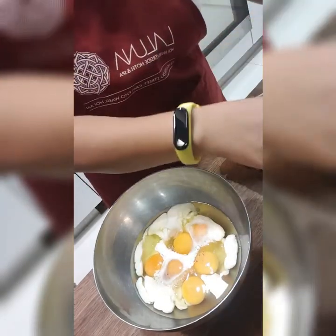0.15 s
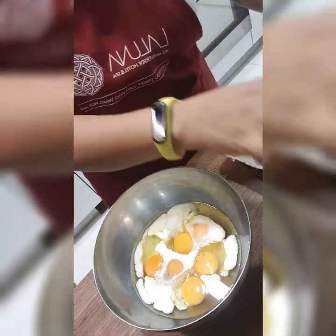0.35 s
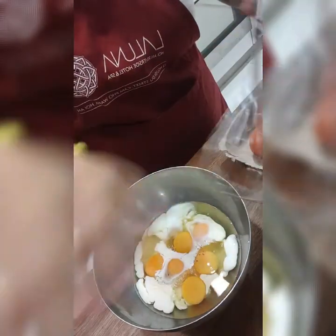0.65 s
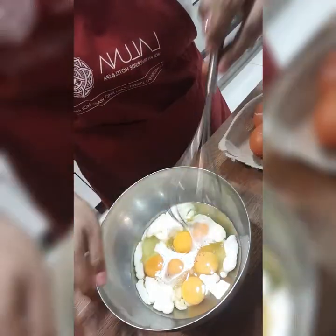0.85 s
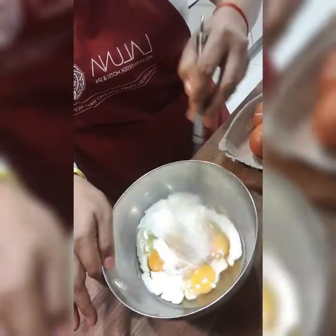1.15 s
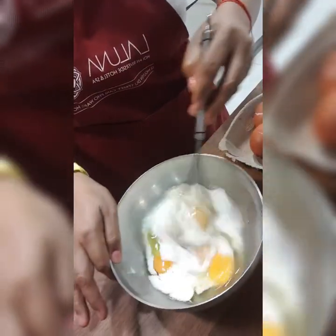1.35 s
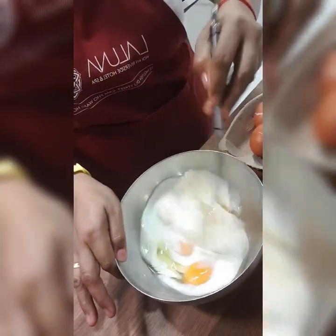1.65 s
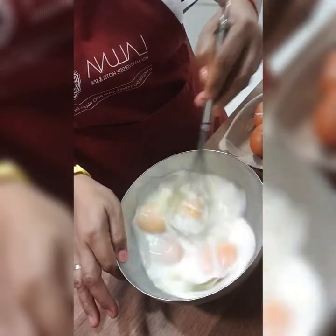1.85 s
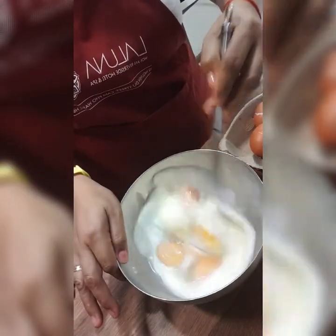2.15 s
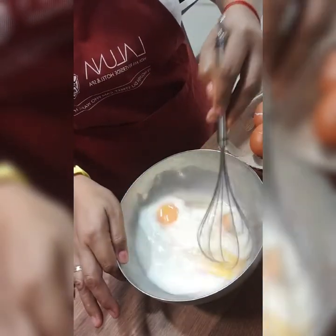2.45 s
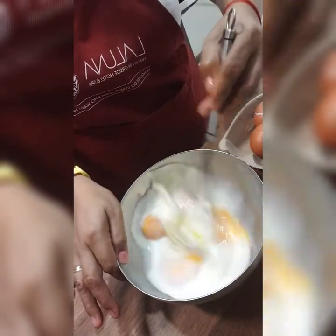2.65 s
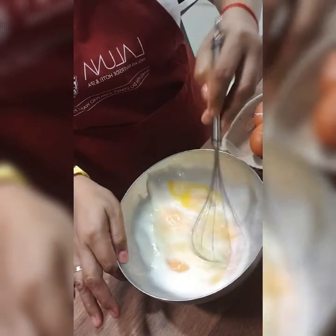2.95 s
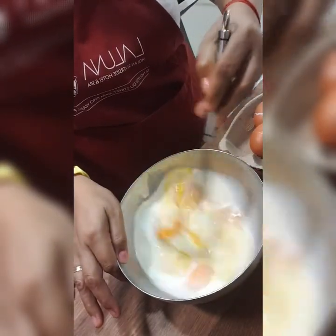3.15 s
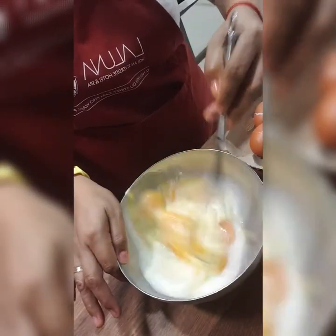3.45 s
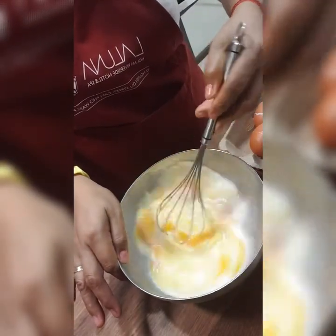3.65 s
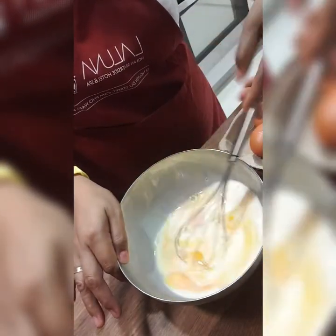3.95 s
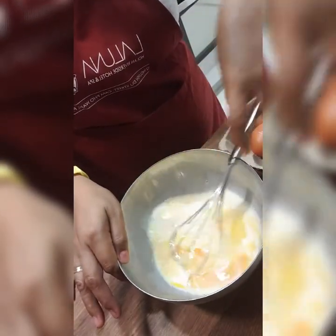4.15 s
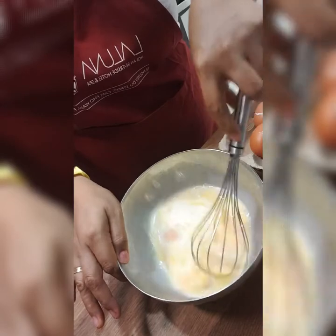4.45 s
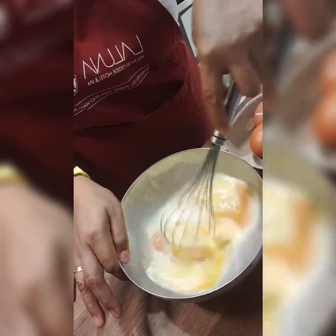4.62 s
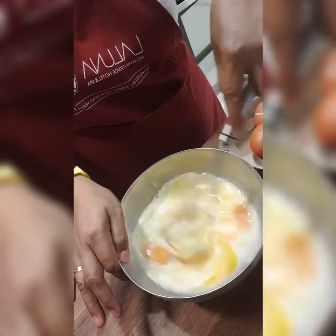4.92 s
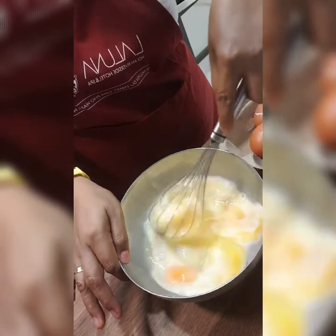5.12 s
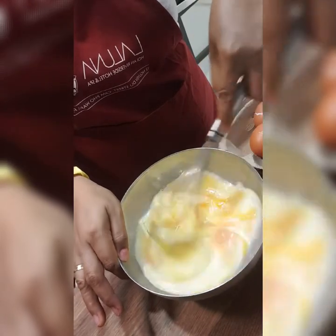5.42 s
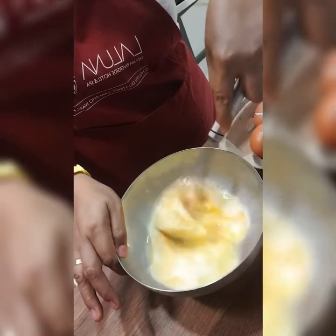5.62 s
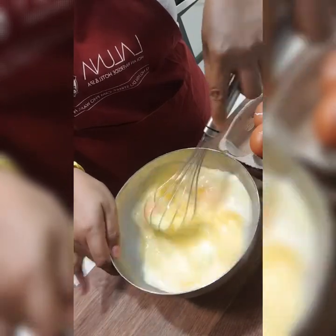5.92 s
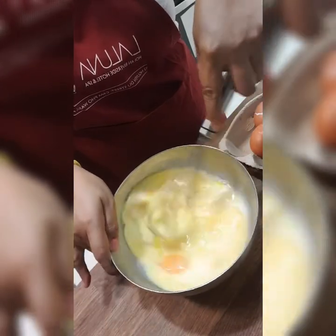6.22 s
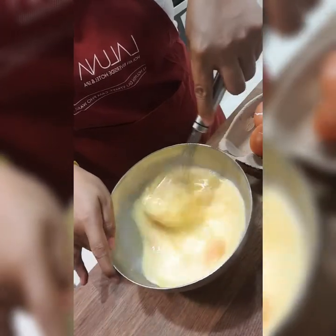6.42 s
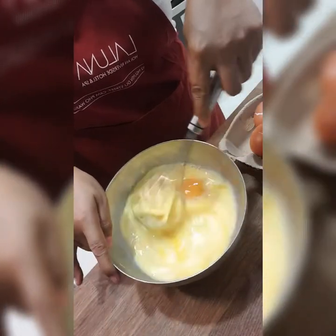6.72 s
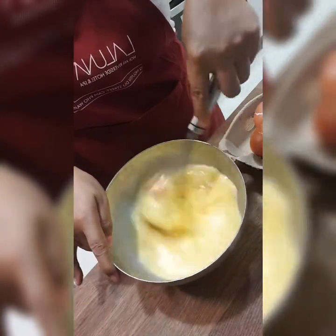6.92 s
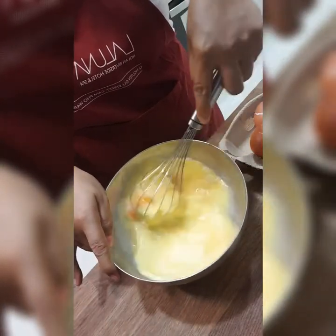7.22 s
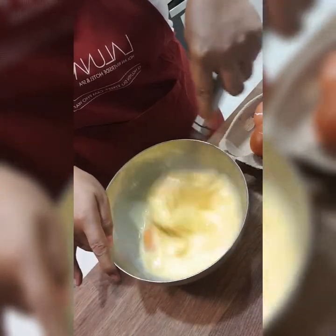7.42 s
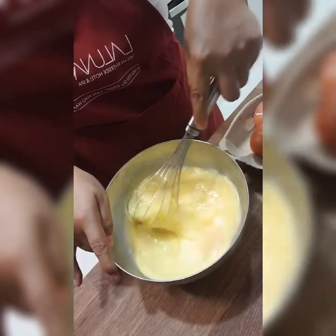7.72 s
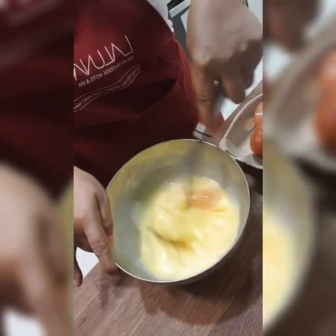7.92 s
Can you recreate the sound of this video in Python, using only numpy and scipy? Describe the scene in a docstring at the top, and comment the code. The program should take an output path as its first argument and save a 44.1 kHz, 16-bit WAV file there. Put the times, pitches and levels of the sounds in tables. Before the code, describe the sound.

Close up in a small kitchen with a faint low hum, a whisk scuffs wood and a steel bowl rocks on the table with quick, fading knocks. After a second the whisk starts: bright metallic clashes and swishes, three or four a second, with small wet plops. Later strokes become wetter and heavier, with slaps, gurgling bubbles and low thumps.

```python
"""Whisking eggs in a steel bowl

Eggs and milk are beaten with a wire whisk in a steel bowl on a wooden table, in a small kitchen with a low hum.
The whisk scuffs the wood and the bowl rocks on its base: friction and impacts excite damped modes.
Then the whisk goes round some three or four times a second: its wires clash on the steel and swish through egg.
Egg slaps shut as bursts of noise, and air pockets ring as damped tones, most with a rising pitch."""
import sys
import numpy as np
from scipy import signal
from scipy.fft import rfft, irfft
from scipy.io import wavfile

SR = 44100
rng = np.random.default_rng(int(sys.argv[2]) if len(sys.argv) > 2 else 0)


def store_pcm(level_fs):
    """Save levels as 16-bit WAV."""
    pcm = np.round(np.clip(level_fs, -1, 1) * 32767).astype(np.int16)
    wavfile.write(sys.argv[1], SR, np.atleast_2d(pcm).T)


N = 355887
TIME = np.arange(N) / SR
AGE = TIME[:SR // 2]  # time since the start of a single event, s

# All table levels are relative: the functions and the final mix scale them.


def from_db(db):
    """Level: decibels to amplitude gain."""
    return 10 ** (np.asarray(db) / 20)


def rms_one(x):
    """Power normalization: scale to unit rms."""
    return x / np.sqrt(np.mean(x ** 2) + 1e-20)


def unit_energy(x):
    """Energy normalization: the impulse response keeps the power of white noise."""
    return x / np.sqrt(np.sum(x ** 2) + 1e-20)


def at_hz(points, hz):
    """Logarithmic frequency scale: interpolate a table along it."""
    table_hz, value = np.transpose(points)
    return np.interp(np.log(np.maximum(hz, 1)), np.log(table_hz), value)


def add(track, s, sound):
    """Superposition: mix a sound into a track at a time."""
    start = max(round(s * SR), 0)
    part = sound[:max(N - start, 0)]
    track[start:start + len(part)] += part


def through(x, response):
    """Linear system: convolve a signal with an impulse response."""
    return signal.fftconvolve(x, response)[:N]


def colour(x, spectrum, size=8192):
    """Minimum-phase filtering: a causal response with the shape of the spectrum, at unit energy."""
    hz = np.arange(size // 2 + 1) * SR / size
    cepstrum = irfft(np.log(from_db(at_hz(spectrum, hz))))
    # folding the cepstrum onto positive times makes the response causal
    cepstrum[1:size // 2] *= 2
    cepstrum[size // 2 + 1:] = 0
    response = irfft(np.exp(rfft(cepstrum)))
    return through(x, unit_energy(response))


def dying(t60):
    """Exponential decay: an envelope that falls 60 dB in t60, held at 1 ms or more."""
    return np.exp(-np.minimum(np.log(1000) * AGE / max(t60, 1e-3), 60))


def ringing(modes):
    """Modal impulse response: damped sines of alternating sign, one row a mode."""
    rows = []
    for k, (hz, db, t60) in enumerate(modes):
        rows.append((-1) ** k * from_db(db) * dying(t60) * np.sin(2 * np.pi * hz * AGE))
    return np.array(rows)


def touched(rings, vary_db):
    """Modal participation: each new point of contact excites the modes in other shares."""
    return from_db(vary_db * rng.standard_normal(len(rings))) @ rings


def grains(per_s, spread_db):
    """Shot noise: random tiny contacts of uneven size and either sign; rms 1."""
    sizes = from_db(spread_db * np.minimum(rng.exponential(1, N), 4))
    signs = rng.choice([-1, 1], N)
    return rms_one(sizes * signs * (rng.random(N) < per_s / SR))


def clumps(per_s, depth_db):
    """Amplitude modulation: an uneven gain with per_s random knots a second; rms 1."""
    knots = np.clip(rng.standard_normal(int(N / SR * per_s) + 2), -2, 2)
    return rms_one(from_db(depth_db * np.interp(TIME * per_s, np.arange(len(knots)), knots)))


def swell(s, db, half):
    """Gaussian envelope: force rises and falls smoothly around a time."""
    return from_db(db) * np.exp(-np.minimum(((TIME - s) / half) ** 2 / 2, 50))


# low hum of the kitchen: pitch_hz, level_db (per Hz)
HUM_COLOUR = [(20, -28.5), (50, -6.5), (105, 3.5), (155, -5.5), (210, -9), (400, -20.5), (600, -26),
              (950, -37), (1400, -44), (4500, -44.5), (6400, -35.5), (8000, -40.5), (9800, -40),
              (16000, -46)]


def hum():
    """Stationary noise: white noise given the spectrum of the room's hum."""
    return from_db(-56) * colour(rng.standard_normal(N), HUM_COLOUR)


# the whisk scuffing the table as it is picked up: middle_s, level_db, half_length_s
SCUFFS = [(-0.019, -33.5, 0.01), (0.206, -86, 0.057), (0.256, -58.5, 0.017), (0.289, -35.5, 0.0058),
          (0.315, -57, 0.028), (0.62, -72.5, 0.031)]
# the whisk's handle and loops lying on the wood: pitch_hz, level_db, t60_s
HANDLE_MODES = [(1015, 2, 0.015), (1680, 3, 0.022), (2310, 6.5, 0.0049), (2880, -5, 0.047),
                (3110, -5, 0.029), (3805, 3.5, 0.007), (4780, 5.5, 0.0081), (7010, 2.5, 0.0057),
                (9720, 2.5, 0.0083), (10400, -12, 0.04)]


def pick_up(scuff_db=-9):
    """Stick-slip friction: the whisk slides over the wood in tiny slips that ring its modes as it lifts."""
    slips = sum(swell(*row) for row in SCUFFS) * grains(per_s=2400, spread_db=3.5)
    clinks = through(slips, unit_energy(ringing(HANDLE_MODES).sum(0)))
    return clinks + from_db(scuff_db) * colour(slips, SWISH_COLOUR)


# the bowl tips and lands on the table: start_s, boom_db, thump_db, knock_db
BUMPS = [(.003, -44, -36.5, -37), (0.057, -37, -42, -32), (1.064, -39.5, -37, -35), (2.286, -42, -62, -40),
         (2.655, -52, -42, -61), (3.576, -45, -38.5, -45), (4.68, -42.5, -37.5, -55.5),
         (4.956, -48.5, -44.5, -50.5), (5.446, -42, -58, -44.5), (5.62, -41, -64, -46),
         (5.645, -35.5, -33, -40), (5.952, -44, -31.5, -45), (6.007, -35.5, -38.5, -62),
         (6.383, -52, -29, -69), (6.943, -47.5, -57, -46), (7.187, -25.5, -38.5, -37),
         (7.696, -27, -26, -30), (7.99, -39, -48, -51)]
# low, lingering modes of the loaded bowl on the table: pitch_hz, level_db, t60_s
BOOM_MODES = [(206.75, 5.5, 0.33), (174.4, 5.5, 0.1), (229.6, 0, 0.2), (285.5, -7.5, 0.17)]
# lowest modes of the bowl on the table: pitch_hz, level_db, t60_s
THUMP_MODES = [(97.1, 3, 0.31), (129.5, -5, 0.46), (51.2, -28, 0.15)]
# higher modes of the bowl on the table, most of them short: pitch_hz, level_db, t60_s
KNOCK_MODES = [(282.3, 5, 0.06), (390, -13.5, 0.029), (503, -3.5, 0.066), (560, -6, 0.054),
               (591, -7.5, 0.061), (900, -31, 0.09), (996, -26.5, 0.36)]


def bumps(boom_db=3.0, thump_db=3, knock_db=3, contact_s=0.0019, thud_db=-9, thud_t60=0.069, thud_hz=420):
    """Modal impact: the bowl's base meets the table; where it lands sets the share of each mode."""
    out, thuds = np.zeros(N), np.zeros(N)
    onset = 1 - np.exp(-AGE / contact_s)
    boom, thump, knock = [ringing(modes) * onset for modes in (BOOM_MODES, THUMP_MODES, KNOCK_MODES)]
    for s, boom_level, thump_level, knock_level in rocking() + pushes() + BUMPS:
        add(out, s, from_db(boom_level + boom_db) * touched(boom, 0.94))
        add(out, s, from_db(thump_level + thump_db) * touched(thump, 1.0))
        add(out, s, from_db(knock_level + knock_db) * touched(knock, 3.5))
        add(thuds, s, from_db(boom_level + thud_db) * dying(thud_t60))
    # the table top's many dull, dense modes are heard as a band of noise
    band = signal.butter(2, [90, thud_hz], "band", fs=SR, output="sos")
    wood = signal.sosfilt(band, signal.unit_impulse(len(AGE)))
    return out + through(thuds * rng.standard_normal(N), unit_energy(wood))


# the first landing of the rocking bowl, and what each later one keeps or loses
ROCK_START_S, ROCK_GAP_S, ROCK_GAP_KEPT, ROCK_UNEVEN_S = .16, .083, .957, .002
ROCK_BOOM_DB, ROCK_THUMP_DB, ROCK_KNOCK_DB = -31.5, -35, -26.5
ROCK_LOSS_DB, ROCK_KNOCK_LOSS_DB = 1.58, 4  # per landing


def rocking(count=9):
    """Energy loss at impact: landings follow at shrinking, slightly uneven gaps, weaker and softer."""
    k = np.arange(count)
    # geometric series of gaps
    s = ROCK_START_S + ROCK_GAP_S * (1 - ROCK_GAP_KEPT ** k) / (1 - ROCK_GAP_KEPT)
    s = s + ROCK_UNEVEN_S * rng.standard_normal(count)
    boom = ROCK_BOOM_DB - ROCK_LOSS_DB * k
    thump = ROCK_THUMP_DB - ROCK_LOSS_DB * k
    knock = ROCK_KNOCK_DB - ROCK_KNOCK_LOSS_DB * k
    return list(zip(s, boom, thump, knock))


# turns of the whisk; the wires strike the wall, then sweep on through the egg:
# start_s, clash_db, rattle_length_s, sweep_delay_s, sweep_db, sweep_wetness_db
STROKES = [(1.0104, -20.5, 0.023, .03, -35, -7), (1.081, -27, 0.026, 0.071, -36.5, -20),
           (1.513, -51.5, 0.0058, 0.057, -50, -15), (1.7885, -22, .025, .05, -45.5, -6),
           (2.122, -49.5, 0.019, 0.037, -64, 2), (2.314, -29.5, 0.018, 0.059, -41.5, -32),
           (2.55, -49.5, 0.0095, 0.086, -38.5, -28), (2.841, -43, 0.031, 0.052, -51.5, 4),
           (2.969, -42.5, 0.006, 0.07, -59, 2.5), (3.118, -40.5, 0.0011, 0.035, -54.5, 5.5),
           (3.314, -22.5, 0.019, 0.084, -44.5, -16), (3.578, -42.5, 0.0067, .078, -43, -9),
           (4.002, -56, .027, 0.056, -47.5, -13), (4.226, -68.5, 0.067, 0.075, -50.5, -26),
           (4.549, -40, 0.014, 0.082, -42, -17), (4.861, -35.5, 0.0067, 0.042, -37, -26),
           (5.111, -38.5, 0.024, 0.052, -34, -10), (5.354, -40, 0.0019, 0.034, -59, -6),
           (5.395, -34, 0.015, 0.044, -33.5, -12), (5.62, -10, 0.0006, 0.024, -40, -5),
           (5.634, -33.5, 0.014, .05, -41, -5), (6.17, -66, 0.009, .046, -41.5, -14.5),
           (6.396, -26.5, 0.0034, 0.082, -42, -6.5), (6.706, -36.5, 0.0075, 0.041, -38, -4.5),
           (6.907, -45.5, 0.0069, .081, -42, -21), (7.189, -27.5, 0.016, .075, -38.5, -16),
           (7.4399, -23.5, 0.002, 0.076, -36.5, -17), (7.701, -18, 0.002, 0.076, -35, -19.5),
           (7.947, -46, 0.0017, 0.076, -36, -25)]
# spectrum of the wires' taps on the wall: pitch_hz, level_db (per Hz)
CLASH_COLOUR = [(300, -18.5), (900, -16.5), (2000, -17.5), (3700, -11), (6000, -4.5), (6900, 2), (7700, 4),
                (8700, -1), (11000, -1.5), (13000, -4.5), (16000, -12.5)]


def clashes(settle_s=0.012, ring_db=-7, wires_db=-8, level_db=1):
    """Repeated impact: wires hit the wall one after another in a tight rattle; steel and wires ring on."""
    out, rattle = np.zeros(N), np.zeros(N)
    contacts, age = grains(per_s=9000, spread_db=2.3), AGE[:SR // 8]
    for s, db, length, *_ in STROKES:
        force = from_db(db) * np.exp(-np.minimum((age / length) ** 2, 50)) * (1 + age / (length + settle_s))
        hits = contacts.take(round(s * SR) + np.arange(len(age)), mode="wrap")
        # every rattle gets the energy of its force, however its contacts fall
        taps = unit_energy(force * hits) * np.linalg.norm(force)
        add(rattle, s, taps)
        add(out, s, from_db(ring_db) * signal.fftconvolve(taps, steel()))
        add(out, s, from_db(wires_db) * signal.fftconvolve(taps, wires()))
    return from_db(level_db) * (colour(rattle, CLASH_COLOUR) + out)


# steel ringing under the wires: pitch_hz, level_db, t60_s
STEEL_MODES = [(7163, -7, .18), (7443, -3, .22), (7576, 0, .33), (7730, -3, .26), (7945, -2, .26),
               (8135, -7, .2), (9950, -6, .12), (11281, -9, .1), (12613, -10, .09)]


def steel():
    """Modal resonance: the steel's strongest modes shift a little with each grip and point of contact."""
    modes = np.array(STEEL_MODES)
    modes[:, 0] *= 1 + .004 * rng.standard_normal(len(modes))
    return unit_energy(touched(ringing(modes), 2))


# wire loops damped by the egg: pitch_hz, level_db
WIRE_MODES = [(1450, -30), (1950, -9), (2600, -8.5), (3100, -3), (3800, 0), (4250, -1.5), (4750, -7),
              (5550, -4), (6200, -17.5), (7150, -0.5), (7600, 9), (8150, -1), (8950, 6), (9600, -8.5),
              (10500, -3.5), (11300, 7.5), (12500, -7), (14000, -24)]


def wires(detune=.06):
    """Damped resonance: a different loop, under a different load of egg, rings briefly at every touch."""
    hz, db = np.transpose(WIRE_MODES)
    hz = hz * np.exp(detune * rng.standard_normal(len(hz)))
    age = AGE[:SR // 25]
    turns = hz[:, None] * age + rng.random((len(hz), 1))  # random starting phase
    rings = from_db(db)[:, None] * np.sin(2 * np.pi * turns)
    return unit_energy(touched(rings, 2) * dying(.02)[:len(age)])


# push levels for a 0 dB clash of 10 ms, and the share of the clash's dB that each follows
PUSH_BOOM_DB, PUSH_BOOM_FOLLOWS = -28, 0.56
PUSH_THUMP_DB, PUSH_THUMP_FOLLOWS = -16, 0.82
PUSH_KNOCK_DB, PUSH_KNOCK_FOLLOWS = -31.5, .6


def pushes():
    """Momentum transfer: a harder, longer clash pushes the bowl harder against the table."""
    s, db, length, *_ = np.transpose(STROKES)
    blow = db + 10 * np.log10(length / .01)
    boom = PUSH_BOOM_DB + PUSH_BOOM_FOLLOWS * blow
    thump = PUSH_THUMP_DB + PUSH_THUMP_FOLLOWS * blow
    knock = PUSH_KNOCK_DB + PUSH_KNOCK_FOLLOWS * blow
    return list(zip(s, boom, thump, knock))


# how much the egg sloshes over time: start_s, level_db
FROTH = [(1.0, -75), (1.2, -67.5), (1.75, -74), (2.22, -70), (3.58, -76.5), (3.79, -118), (5.21, -77.5),
         (5.61, -58.5), (5.82, -54.5), (5.94, -64), (6.24, -75.5), (6.63, -64), (6.81, -62.5), (7.36, -68),
         (7.52, -52), (7.79, -79), (7.95, -49.5), (8.07, -42)]


def slosh(snaps_db=-5, plops_db=1.0, ticks_db=-9):
    """Bubble and film collapse: small bubbles plop, sticky films snap in clumps, stray wires tick on the wall."""
    plops = fizz(per_s=150, spread_db=3.5, low_hz=1200, high_hz=5000, cycles=24, rise=8)
    snaps = colour(grains(per_s=1500, spread_db=3), SLAP_COLOUR) * clumps(90, 5)
    ticks = colour(grains(per_s=200, spread_db=3), CLASH_COLOUR) * clumps(40, 4)
    stirred = from_db(np.interp(TIME, *np.transpose(FROTH))) * clumps(25, 2)
    stirred = stirred * (TIME > STROKES[0][0])  # silent before the first stroke
    return stirred * (from_db(plops_db) * plops + from_db(snaps_db) * snaps + from_db(ticks_db) * ticks)


def fizz(per_s, spread_db, low_hz, high_hz, cycles, rise, count=18):
    """Bubble-cloud resonance: a crowd of small bubbles, each dying away within some twenty cycles; rms 1."""
    contacts = grains(per_s, spread_db)
    dealt = rng.integers(0, count, N)  # which bubble size each contact gets
    out = np.zeros(N)
    for k, hz in enumerate(np.geomspace(low_hz, high_hz, count)):
        ring = unit_energy(bubble(hz, cycles / hz, rise * hz)[:SR // 20])
        for i in np.flatnonzero(contacts * (dealt == k)):
            add(out, i / SR, contacts[i] * ring)
    return rms_one(out)


# spectrum of the sliding wires: pitch_hz, level_db (per Hz)
SWISH_COLOUR = [(500, -48), (1500, -49), (3000, -18), (5500, -1.5), (7800, -7.5), (10000, -1),
                (13000, -0.5), (16000, -7.5)]
SWEEP_WIDTH = 0.34  # half length of a sweep as a share of its delay: a slower stroke sweeps longer


def swishes(hiss_db=-3.0, wires_db=-1.5, wet_db=-1):
    """Stick-slip friction: each sweep drags the wires along the wall and tears egg films into fine bubbles."""
    out, scrape, wet = np.zeros(N), np.zeros(N), np.zeros(N)
    slips = grains(per_s=1500, spread_db=3.1) * clumps(200, 3.5)
    for s, _, _, delay, db, wetness_db in STROKES:
        sweep = swell(s + delay, db, SWEEP_WIDTH * delay)
        scrape += sweep
        wet += sweep * from_db(wetness_db)
        start = round(s * SR)
        add(out, s, signal.fftconvolve((sweep * slips)[start:start + SR // 2], wires()))
    hiss = colour(scrape * slips, SWISH_COLOUR)
    froth = wet * fizz(per_s=700, spread_db=4, low_hz=1400, high_hz=7000, cycles=22, rise=8)
    return from_db(hiss_db) * hiss + from_db(wires_db) * out + from_db(wet_db) * froth


# the loudest air pockets opening, small and large: start_s, pitch_hz, level_db, t60_s, rise_hz_per_s
BUBBLES = [(1.175, 3260, -30, 0.01, 30000), (1.367, 1600, -39.5, .017, 2992),
           (1.834, 1820, -30, 0.025, 2998), (2.166, 817, -26, .21, 9494.5), (2.285, 1846, -18, 0.022, 3001),
           (2.55, 1690, -31, 0.028, 1000), (2.673, 1475, -31, 0.055, 4000),
           (2.861, 1320, -40.5, 0.077, 2997), (3.309, 4040, -18, 0.021, 8005.5),
           (3.594, 1873, -27, 0.044, 29997), (3.701, 968, -41.5, 0.095, 393.5),
           (5.175, 1208, -35, 0.11, 624), (5.478, 2730, -34.5, 0.035, 15000),
           (5.514, 1356, -37.5, 0.061, 4006), (5.62, 726, -26, .13, -3), (5.667, 814, -27.5, 0.11, 13000),
           (5.765, 2660, -29, 0.025, 3003), (5.767, 1660, -32, 0.051, 3000),
           (5.814, 1600, -36.5, 0.046, 1000), (5.916, 1810, -26.5, 0.019, 13991),
           (6.394, 944, -18, 0.077, 800), (6.566, 784, -34.5, 0.14, 12991),
           (6.571, 3560, -30.5, 0.053, 25000), (7.031, 3740, -27.5, 0.014, 25000),
           (6.959, 1073, -32.5, 0.16, 3000), (6.972, 2856, -27, 0.042, 3000),
           (7.107, 2050, -29, 0.036, 3019), (7.185, 525, -11.5, 0.13, 310), (7.208, 684, -15, 0.11, 19003),
           (7.242, 1340, -20, 0.029, 18000), (7.281, 1680, -27, 0.042, 3000),
           (7.347, 1622, -20, 0.037, 3000), (7.442, 1680, -25, 0.029, 4053), (7.7, 584, -15.5, 0.076, 0),
           (7.702, 870, -17.5, 0.036, 3), (7.711, 2360, -19.5, 0.025, 10000),
           (7.739, 1480, -25, 0.02, 5000), (7.794, 1166, -33.5, 0.19, 14000),
           (7.873, 977, -26, 0.074, 5000), (8.032, 1600, -30.5, 0.056, 3000)]


def bubbles(pop_db=-11, pop_t60=0.018):
    """Bubble resonance: the loudest pockets open with a pop of noise and ring."""
    rings, pops = np.zeros(N), np.zeros(N)
    for s, hz, db, t60, rise in BUBBLES:
        add(rings, s, from_db(db) * bubble(hz, t60, rise))
        add(pops, s, from_db(db + pop_db) * dying(pop_t60))
    return rings + colour(pops * rng.standard_normal(N), SLAP_COLOUR)


def bubble(hz, t60, rise):
    """Volume pulsation: a pocket swoops up as it pinches off, drifts in pitch near the surface, then opens."""
    swoop = 1 - .2 * np.exp(-AGE * hz / 1.5)
    pitch = np.minimum(hz * swoop + rise * AGE, SR / 4)
    opening = np.exp(-np.minimum((2 * AGE / t60) ** 4, 50))  # cuts the ring short
    onset = 1 - np.exp(-AGE * hz)
    return dying(t60) * opening * onset * np.sin(2 * np.pi * np.cumsum(pitch) / SR)


# a fold of egg smacks shut: start_s, level_db, decay_s (to 1/e)
SLAPS = [(1.79, -59, 0.063), (2.165, -33.5, 0.002), (2.677, -47, 0.014), (3.3065, -41, 0.0039),
         (3.577, -32.5, 0.0044), (5.38, -41, 0.0099), (5.622, -16.5, 0.0037), (5.952, -42.5, 0.0086),
         (6.128, -46, 0.0079), (6.393, -16.5, 0.0022), (6.566, -40, 0.0068), (6.958, -29.5, 0.0024),
         (7.187, -22.5, 0.0048), (7.281, -27, 0.0053), (7.347, -28, 0.0016), (7.436, -28, 0.012),
         (7.7, -21.5, 0.0074)]
# spectrum of slapping egg: pitch_hz, level_db (per Hz)
SLAP_COLOUR = [(300, -26), (800, -4.5), (1600, -5.5), (2700, -4), (4000, -8.5), (6000, -6), (9000, -11.5),
               (16000, -30)]


def slaps(spray_db=-15, spray_s=0.0094):
    """Liquid impact: a fold of egg smacks shut in a dense spatter, with a sparser patter of droplets."""
    force, spray = np.zeros(N), np.zeros(N)
    for s, db, decay in SLAPS:
        add(force, s, from_db(db) * np.exp(-np.minimum(AGE / decay, 50)))
        add(spray, s, from_db(db + spray_db) * np.exp(-np.minimum(AGE / spray_s, 50)))
    spatter = force * grains(per_s=12000, spread_db=-7.0)
    patter = spray * grains(per_s=530, spread_db=4)
    return colour(spatter + patter, SLAP_COLOUR)


# kitchen reverberation: pitch_hz, t60_s
KITCHEN_DECAY = [(300, .42), (1000, .36), (3000, .42), (7500, .45), (11000, .37), (16000, .27)]


def kitchen(x, room_db, early_db=0, early_t60=0.11, build_s=0.003, count=10):
    """Diffuse reverberation: noise bands decay quickly for the table and apron, slowly for the room."""
    edges, tail = np.geomspace(250, 17000, count + 1), 0
    for low, high in zip(edges, edges[1:]):
        band_filter = signal.butter(2, [low, high], "band", fs=SR, output="sos")
        band = signal.sosfilt(band_filter, rng.standard_normal(len(AGE)))
        room = dying(at_hz(KITCHEN_DECAY, np.sqrt(low * high)))
        early = from_db(early_db) * dying(early_t60)
        tail = tail + band * (room + early)
    response = unit_energy(tail * (1 - np.exp(-AGE / build_s)))
    return x + from_db(room_db) * through(x, response)


def scene():
    """Superposition: whisk, egg and bowl sound in the kitchen over its low hum."""
    whisk = from_db(-1.5) * kitchen(clashes() + swishes() + pick_up(), room_db=-11.5)
    egg = from_db(-3.0) * kitchen(slaps() + bubbles() + slosh(), room_db=-9)
    table = from_db(-5.0) * kitchen(bumps(), room_db=-1)
    return (whisk + egg + table + hum())[None]


def record(dry):
    """Low-pass filtering: the top is cut steeply above 16 kHz."""
    return signal.sosfilt(signal.ellip(10, .1, 80, 16000, fs=SR, output="sos"), dry)


dry = scene()
out = record(dry)
store_pcm(out)
```